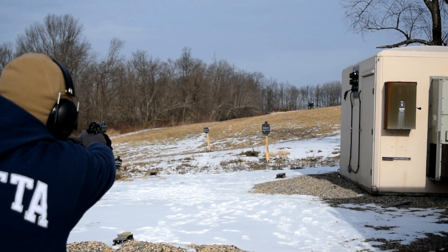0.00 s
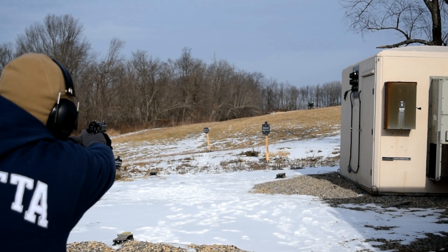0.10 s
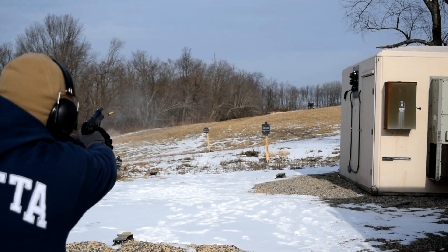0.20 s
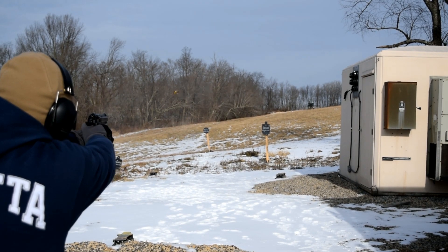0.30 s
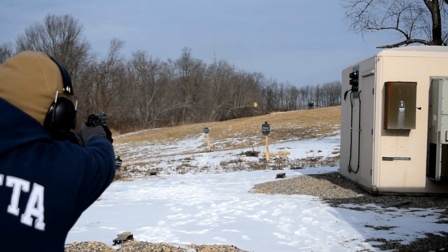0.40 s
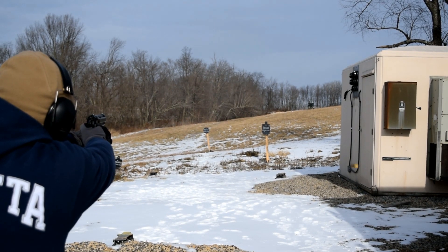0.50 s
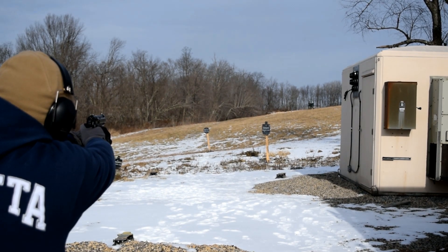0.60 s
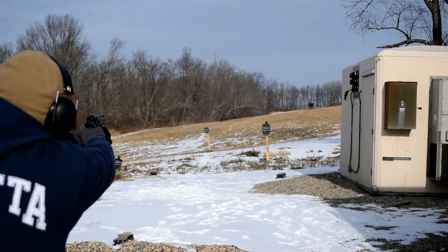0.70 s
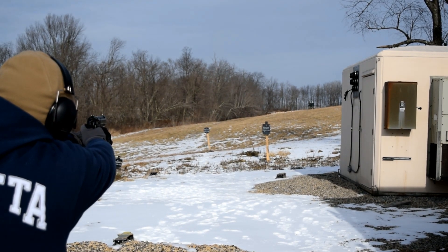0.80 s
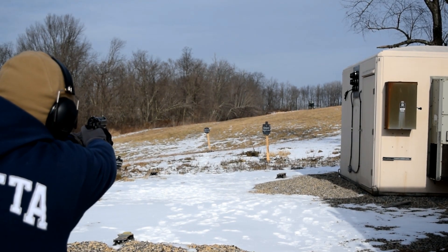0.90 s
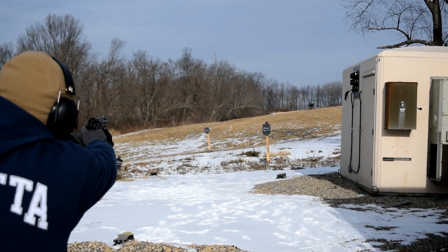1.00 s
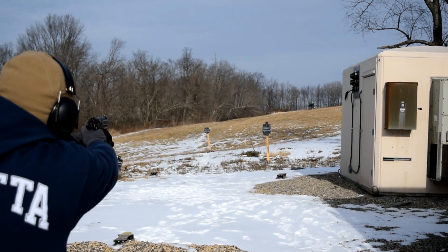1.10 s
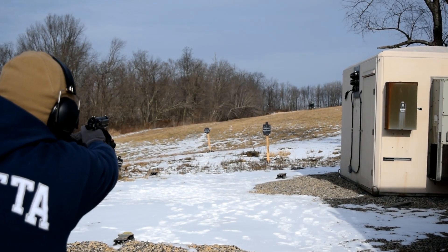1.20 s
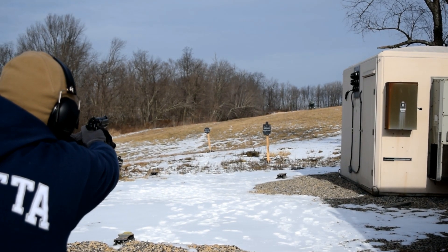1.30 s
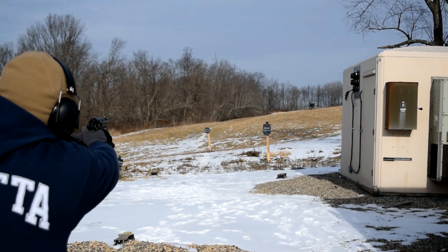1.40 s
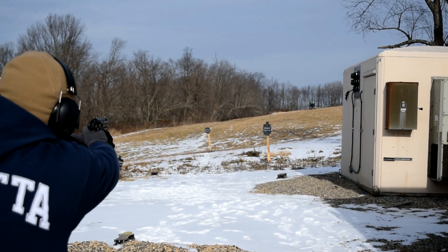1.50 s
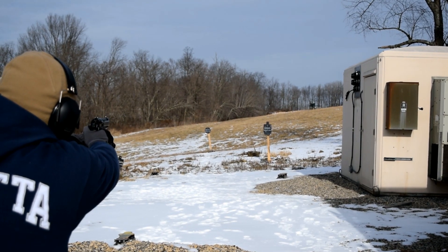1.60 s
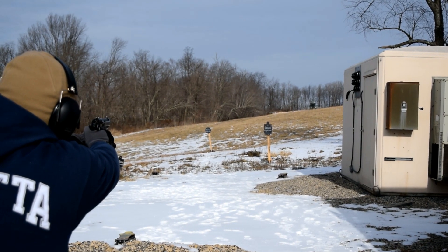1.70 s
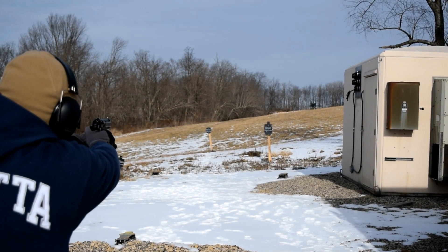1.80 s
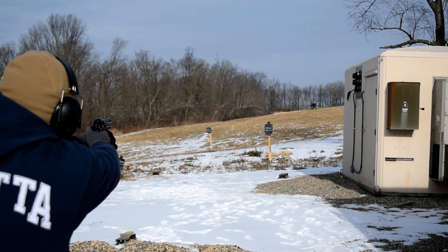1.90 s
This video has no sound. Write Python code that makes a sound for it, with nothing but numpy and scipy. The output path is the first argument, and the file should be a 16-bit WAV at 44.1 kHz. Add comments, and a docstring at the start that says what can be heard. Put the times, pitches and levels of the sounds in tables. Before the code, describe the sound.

After a brief moment of faint wind and hiss, one harsh, clipped pistol blast bursts out nearby, followed by quick hard reflections and a long, uneven forest echo that loses treble as the background returns.

```python
"""Pistol shot with woodland echo

A pistol shot on a snowy outdoor range overloads a nearby camera microphone: noise bursts and low pressure swings.
Hard slaps, made of short rings and crackle, come back from the shed and the range fittings.
Then a long echo rolls out of the woods, ever duller: random returns that lose treble with time.
The recorder's gain ducks at the blast and lets the wind and hiss return as the echo fades."""
import sys
import numpy as np
from scipy import signal
from scipy.fft import rfft, irfft, next_fast_len
from scipy.io import wavfile
from scipy.ndimage import uniform_filter1d, minimum_filter1d, map_coordinates

SR = 44100
rng = np.random.default_rng(int(sys.argv[2]) if len(sys.argv) > 2 else 0)


def dump(signal):
    """Clip the signal to [-1, 1] and save it as 16-bit WAV at the path in sys.argv[1]."""
    limited = np.clip(np.atleast_2d(signal).T, -1, 1)
    pcm = np.round(limited * 32767).astype(np.int16)
    wavfile.write(sys.argv[1], SR, pcm)


N = 88200  # two seconds of samples
T = np.arange(N) / SR  # time of each sample, in seconds
SHOT_S = 0.2486
SLAP_RISE_S = 0.0012  # how fast each reflected ring swells

# All source levels are those ahead of the recorder's gain. Colours give only the relative tone of a noise.
# Colour of the boom: pitch_hz, level_db
BOOM_COLOUR = [(30, -30.5), (170, -7.5), (400, -11.5), (660, 0.5), (1000, 0), (1400, -16.5), (2600, -19.5),
               (5000, -29), (15000, -41.5)]
# Colour of the crackle in the hammer and the slaps: pitch_hz, level_db
CRACKLE_COLOUR = [(60, -11), (400, -8.5), (1300, 5), (1900, -2), (2600, -1), (3400, -4), (7000, -14),
                  (15000, -39)]


def amp(db):
    """Turn decibels into a gain."""
    return 10 ** (np.asarray(db) / 20)


def unit(x):
    """Scale a sound to an average (rms) strength of 1."""
    return x / np.sqrt(np.mean(x ** 2) + 1e-20)


def along(points, hz):
    """Read a curve of (Hz, value) points at any frequency, on a log axis."""
    point_hz, value = np.transpose(points)
    return np.interp(np.log(hz + 1), np.log(point_hz + 1), value)


def filtered(x, response):
    """Multiply the spectrum of x by a gain that depends on frequency."""
    size = next_fast_len(N + SR // 2)  # spare room stops the end wrapping onto the start
    spectrum = rfft(x, size) * response(np.fft.rfftfreq(size, 1 / SR))
    return irfft(spectrum, size)[..., :N]


def noise(colour):
    """Make steady coloured noise of rms 1."""
    return unit(filtered(rng.standard_normal(N), lambda hz: amp(along(colour, hz))))


def wobble(rate):
    """Draw a smooth random curve through so many random points a second."""
    return map_coordinates(rng.standard_normal(1024), [T * rate], mode="wrap")


def decay(start, t60):
    """Start suddenly at 1, then die away by 60 dB in t60 seconds."""
    return (T >= start) * np.exp(-np.log(1000) * np.maximum(T - start, 0) / t60)


def ring(start, hz, t60, rise):
    """Make a few cycles that swell and die, under an envelope that peaks at 1."""
    age = np.maximum(T - start, 0)
    swell = decay(start, t60) * (1 - np.exp(-age / rise)) ** 2
    return np.sin(2 * np.pi * hz * age) * swell / swell.max()


def breeze():
    """Light wind over hiss: one coloured noise whose level drifts gently."""
    # Colour of wind and hiss: pitch_hz, level_db
    floor_colour = [(15, -43), (25, -11.5), (62, -5), (164, -10.5), (281, -9), (410, -14), (482, -15.5),
                    (804, -20.5), (945, -15), (1110, -28), (2700, -41.5), (3440, -38.5), (15500, -40)]
    level_db = -36.5 + 1.5 * wobble(15)
    return amp(level_db) * noise(floor_colour)


def woods():
    """Many trunks return the shot; later echoes have lost more treble to the air."""
    # Echo strength over time: time_s, level_db
    strength = [(.5, -34.5), (.582, -7.5), (.612, 6), (.67, 4.5), (.77, 3), (.88, 4.5), (.94, -0.5),
                (.98, 7.5), (1.06, 1), (1.135, -1), (1.19, 5), (1.32, -2), (1.45, -6.5), (1.53, -9),
                (1.68, -15.5), (1.82, -20), (2, -23.5)]
    # Colour of the echo at the forest edge: pitch_hz, level_db
    edge_colour = [(40, -43.5), (200, -38), (350, -21.5), (500, -8.5), (700, -1.5), (880, 0), (1100, -4.5),
                   (1400, -16), (1900, -27), (2600, -24.5), (3400, -39.5), (6000, -46.5), (15000, -58)]
    trunks_per_s, trunk_share = 260, 0.39  # the share is of power; the rest is smooth noise
    edge_s = 0.54  # air loss counts from here
    air_db_per_s, air_power = 23, 1.39  # loss at 5 kHz, and its growth with frequency
    hits = rng.random(N) < trunks_per_s / SR
    trunks = unit(hits * rng.choice([-1, 1], N))
    returns = np.sqrt(trunk_share) * trunks + np.sqrt(1 - trunk_share) * rng.standard_normal(N)
    returns = unit(filtered(returns, lambda hz: amp(along(edge_colour, hz))))
    # Split into short slices so that each moment can lose its own amount of treble
    hz, t, slices = signal.stft(returns, SR, nperseg=512)
    air_db = air_db_per_s * (hz[:, None] / 5000) ** air_power * np.maximum(t - edge_s, 0)
    dulled = signal.istft(slices * amp(-air_db), SR, nperseg=512)[1][:N]
    flutter_db = 1.04 * wobble(44.52)
    return dulled * amp(np.interp(T, *np.transpose(strength), left=-120) + flutter_db)


def far_slaps():
    """Strong single returns from the woods, with no crackle left: short rings above the rolling echo."""
    # Returns: start_s, level_db, pitch_hz
    returns = [(0.573, -4, 2430), (.5880, 9.5, 935), (.607, 12, 880), (1.0710, 13, 825), (1.1230, 14, 700),
               (1.1515, 11.5, 920), (1.229, 9, 780), (1.337, -15.5, 2370), (1.527, -2, 1000),
               (1.647, -7.5, 1176), (1.659, -1, 860)]
    t60_s = 0.011
    return sum(amp(db) * ring(s, hz, t60_s, SLAP_RISE_S) for s, db, hz in returns)


def ticks():
    """Faint dry ticks on top of the echo: very short bursts of noise."""
    # Ticks: start_s, level_db
    tick_times = [(.609, -23), (.6285, -13), (.653, -17), (0.672, -12.5), (.692, -21), (.748, -18),
                  (0.957, -9.5), (0.963, -14), (1.073, -13), (1.136, -18), (1.2305, -18), (1.529, -27)]
    # Colour of a tick: pitch_hz, level_db
    tick_colour = [(500, 2), (3500, 1.5), (7000, -8.5), (15000, -20.5)]
    t60_s = 0.0049
    return noise(tick_colour) * sum(amp(db) * decay(s, t60_s) for s, db in tick_times)


def field():
    """Rough open ground scatters the blast back as noise, and earth banks answer with dull swells."""
    # Scatter off the ground over time: time_s, level_db
    scatter = [(.25, -7.5), (.295, -4.5), (.335, -4.5), (.40, -9.5), (.455, -14), (.51, -8.5), (.57, -3.5),
               (.66, -18.5), (.8, -58.5)]
    # Colour of the scatter: pitch_hz, level_db
    field_colour = [(40, -23.5), (150, -17), (320, -0.5), (560, -4), (900, 3), (1350, -5), (2000, -15.5),
                    (2650, -15), (3300, -21), (7000, -31.5), (15000, -46.5)]
    # Returns of the banks: centre_s, spread_s, level_db
    bank_returns = [(0.571, 0.024, -10.5), (1.21, .05, -28)]
    # Colour of the banks: pitch_hz, level_db
    bank_colour = [(30, -19), (100, -18), (170, 8), (260, 0.5), (450, -15.5), (1500, -59.5)]
    level_db = np.interp(T, *np.transpose(scatter)) + 1.7 * wobble(110)
    ground = (T > SHOT_S) * amp(level_db) * noise(field_colour)
    swells = sum(amp(db) * np.exp(-0.5 * ((T - s) / spread) ** 2) for s, spread, db in bank_returns)
    return ground + swells * noise(bank_colour)


def slaps():
    """Near surfaces return two-pitch rings, a scrap of boom, and a crackle that the ground repeats."""
    # Near reflections: start_s, level_db, pitch_hz, ring_t60_s, upper_pitch_hz,
    # then upper_ring_db and crackle_db, both counted from level_db
    reflections = [(0.3032, 29.5, 790, 0.0094, 2810, -13, -15), (0.3103, 17, 950, 0.02, 2540, -8, -8),
                   (0.3149, 21, 997, 0.012, 2460, -18, -14), (0.329, 13, 636, 0.014, 2550, -8.5, -7.5),
                   (0.3559, 19, 890, 0.011, 2560, -35, -39), (0.3732, 24.5, 1251, 0.0043, 2300, -7, -7.5),
                   (0.4185, 25, 1226, 0.0056, 2790, -10.5, -5), (.4470, 0, 1110, 0.0056, 2480, -11, -5.5),
                   (0.472, -2, 1080, 0.022, 2760, -20, -4.5), (.4935, -4.5, 940, 0.016, 2600, -4, -7.5)]
    crackle_t60_s = 0.007
    ground_delay_s, ground_db = 0.002, -3
    scrap_db, scrap_t60_s = -17, 0.051
    out, crackle, boom = np.zeros(N), noise(CRACKLE_COLOUR), noise(BOOM_COLOUR)
    for s, db, hz, t60, upper_hz, upper_db, crackle_db in reflections:
        noise_start = s + SLAP_RISE_S / 2
        burst = decay(noise_start, crackle_t60_s)
        burst += amp(ground_db) * decay(noise_start + ground_delay_s, crackle_t60_s)
        scrap = amp(scrap_db) * decay(noise_start, scrap_t60_s) * boom
        rings = ring(s, hz, t60, SLAP_RISE_S)
        rings += amp(upper_db) * ring(s, upper_hz, t60, SLAP_RISE_S)
        out += amp(db) * (rings + scrap + amp(crackle_db) * burst * crackle)
    return out


def pushes():
    """Air pressure pushes and then sucks; the microphone's bass cut turns this into a low swing."""
    # Low pressure pushes: start_s, level_db (of the pulse, before the bass cut)
    pulses = [(.249, 6), (0.271, 4), (0.3039, 23.5), (0.421, 5.5)]
    push_s, bass_cut_hz = 0.0024, 57  # push_s is the time until the push turns to suction
    wave = np.zeros(N)
    for s, db in pulses:
        age = np.maximum(T - s, 0) / push_s
        onset = 1 - np.exp(-10 * age)
        wave += amp(db) * (1 - age) * np.exp(-age) * onset
    return signal.sosfilt(signal.butter(4, bass_cut_hz, "high", fs=SR, output="sos"), wave)


def muzzle():
    """The hammer falls; then a bright shock front and a dense boom that holds and collapses."""
    # Colour of the shock front: pitch_hz, level_db
    crack_colour = [(100, -2.5), (1000, -9), (2800, 14.5), (5000, -10), (9000, 5), (15000, -10.5)]
    hammer_s, hammer_db, hammer_t60_s = 0.2432, -21.5, 0.04
    boom_db, boom_hold_s, boom_fall_db_per_s = 23.5, 0.022, 1898
    crack_db, crack_t60_s = 16, 0.022
    spray_db, spray_t60_s = 10, 0.085  # a weaker, longer tail of the same bright noise
    age = np.maximum(T - SHOT_S, 0)
    hammer = amp(hammer_db) * decay(hammer_s, hammer_t60_s) * noise(CRACKLE_COLOUR)
    boom_level_db = boom_db - boom_fall_db_per_s * np.maximum(age - boom_hold_s, 0)
    boom = noise(BOOM_COLOUR) * (1 - np.exp(-age / 0.003)) * amp(boom_level_db)
    bright = amp(crack_db) * decay(SHOT_S, crack_t60_s) + amp(spray_db) * decay(SHOT_S, spray_t60_s)
    return hammer + boom + noise(crack_colour) * bright


def scene():
    """Add the open air, the echoes and the shot."""
    echoes = woods() + far_slaps() + ticks() + field() + slaps()
    return (breeze() + echoes + pushes() + muzzle())[None]


def ducked(dry):
    """Overload makes the gain duck, hold and slowly recover."""
    overload_db, duck_db = 21, 16
    attack_s, hold_s, recover_db_per_s = 0.01, 0.84, 32.5
    overloaded = np.abs(dry[0]) > amp(overload_db)
    since = T - np.maximum.accumulate(np.where(overloaded, T, -10))  # seconds since the last overload
    wanted_db = np.clip(duck_db - recover_db_per_s * (since - hold_s), 0, duck_db)
    pole = np.exp(-1 / (attack_s * SR))  # smooths the change of gain
    return dry * amp(-signal.lfilter([1 - pole], [1, -pole], wanted_db))


def limited(x):
    """A quick limiter turns peaks down by up to 8 dB."""
    peak_db, range_db, window_s = -3.5, 8, 0.0061
    size = int(window_s * SR)
    need_db = np.clip(peak_db - 20 * np.log10(np.abs(x) + 1e-9), -range_db, 0)
    return x * amp(uniform_filter1d(minimum_filter1d(need_db, size), size))


def band_limit(hz):
    """Cut the treble steeply above 15.7 kHz."""
    return 1 / np.sqrt(1 + (hz / 15700) ** 120)


def record(dry):
    """Duck and limit the sound, clip what is still too loud, then cut the top treble."""
    clip_top = 0.93
    clipped = np.clip(limited(ducked(dry)), -clip_top, clip_top)
    return filtered(clipped, band_limit)


dry = scene()
out = record(dry)
dump(out)
```